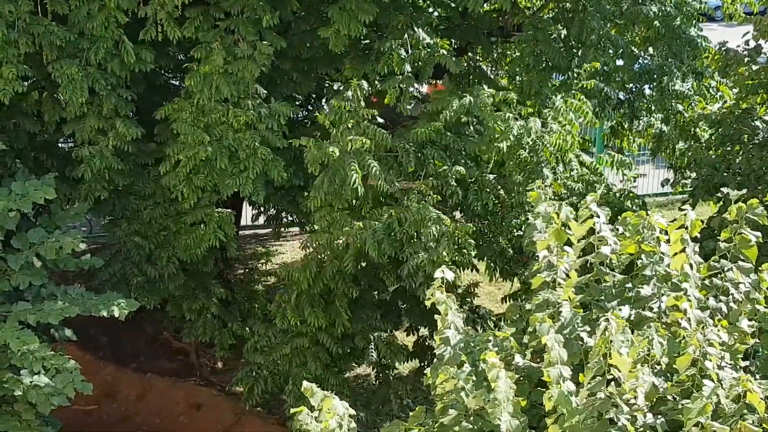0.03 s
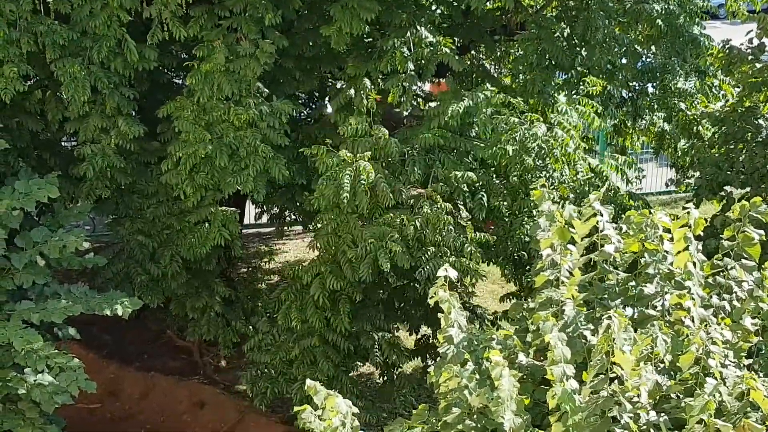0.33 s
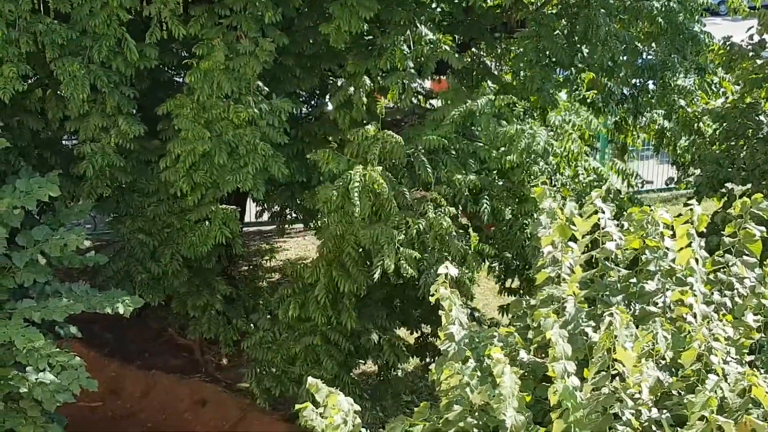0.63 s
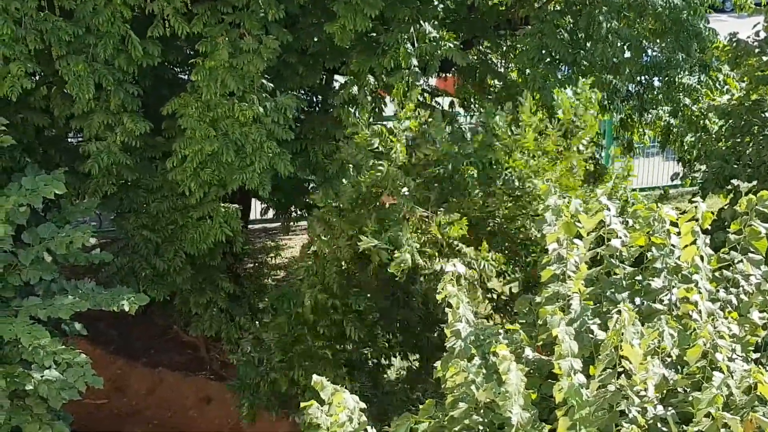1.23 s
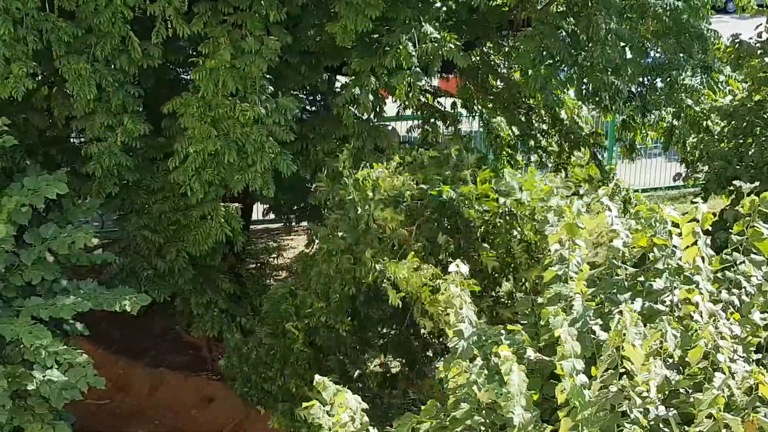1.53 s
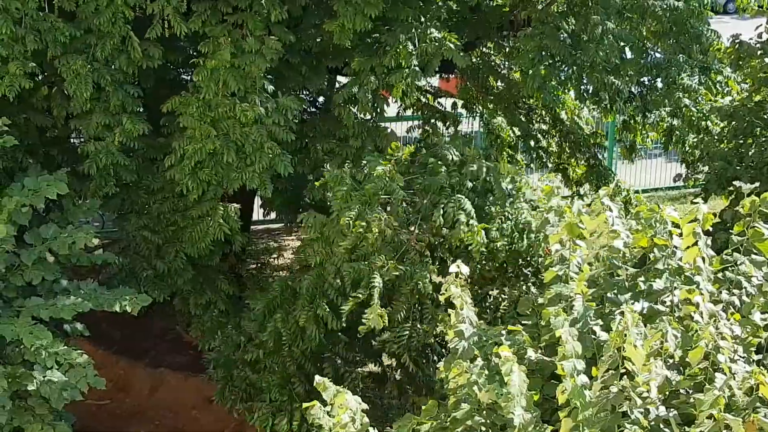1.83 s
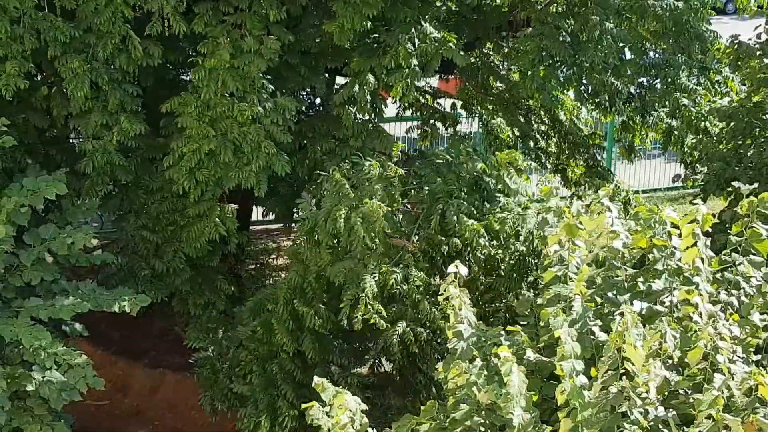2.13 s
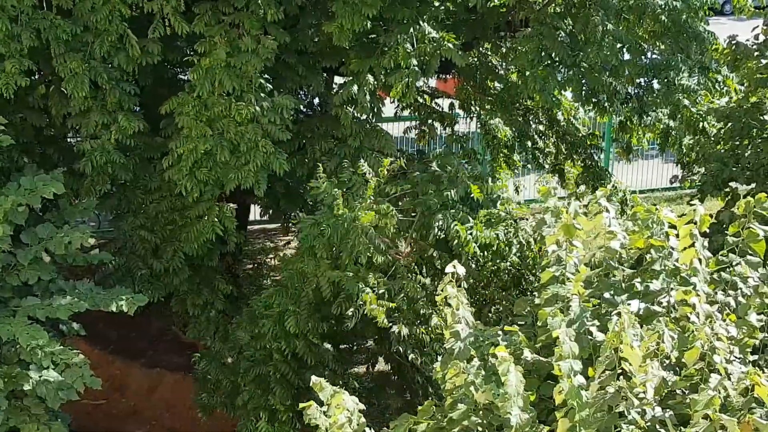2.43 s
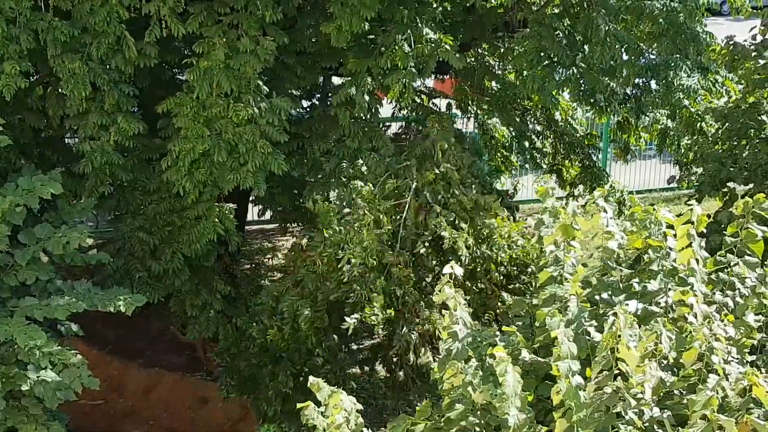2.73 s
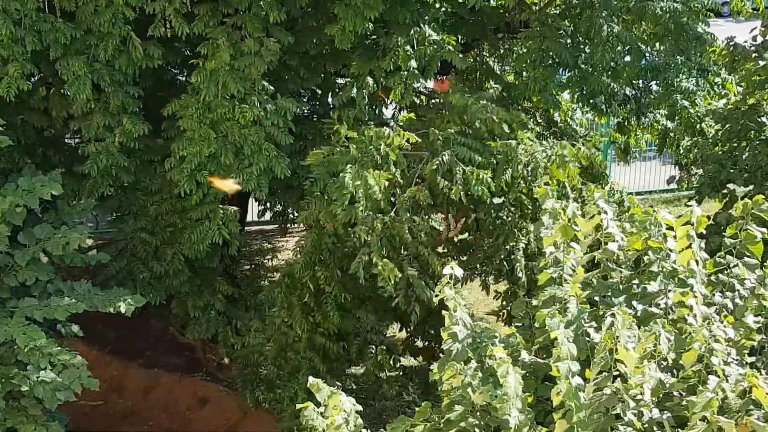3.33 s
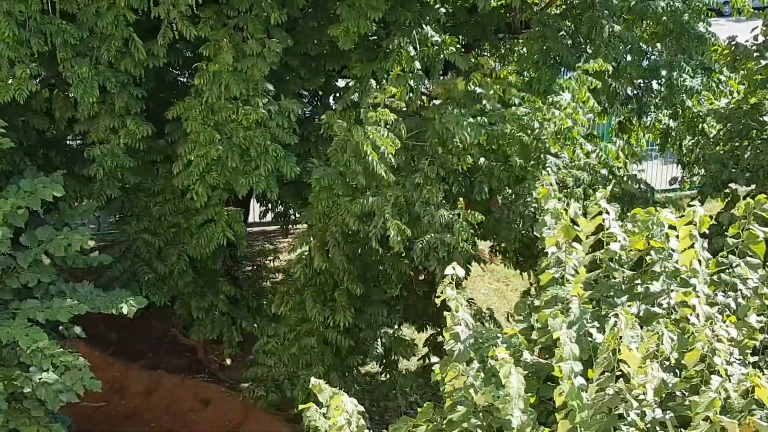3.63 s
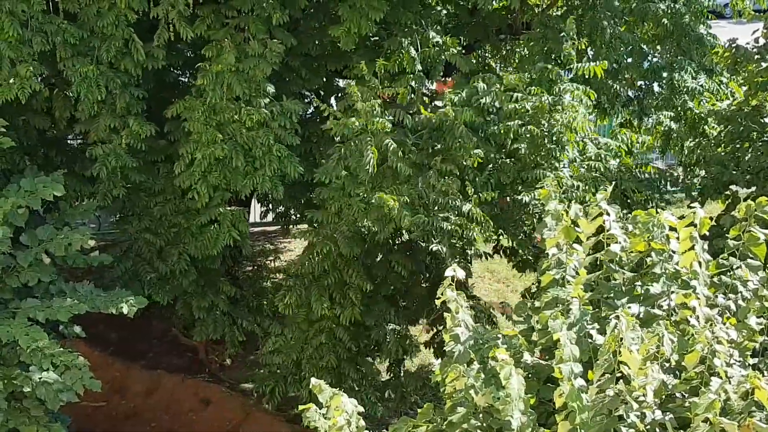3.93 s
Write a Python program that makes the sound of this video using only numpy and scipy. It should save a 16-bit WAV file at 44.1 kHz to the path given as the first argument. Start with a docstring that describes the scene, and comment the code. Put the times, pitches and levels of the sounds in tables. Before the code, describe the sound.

Wood splinters as a small tree is pushed in a park: scattered cracks, a burst of snaps with rustling foliage, a lull, then another burst. Heard from some way off, over a labouring diesel engine that slowly quietens.

```python
"""A diesel machine pushes against a small tree in a park, heard from some way off and above.
The engine labours from the start; wood begins to crack and a faint whistle passes. Just before 1 s
fibres snap in a volley, the trunk thuds and the swaying crown swishes. After 2 s the engine eases and
a puff of air rumbles by. Near 2.8 s comes a second volley and swish, then a few last cracks.
House fronts all around give the cracks a short echo."""
import sys
import numpy as np
from scipy import signal
from scipy.fft import rfft, irfft, next_fast_len
from scipy.io import wavfile

SR = 44100
rng = np.random.default_rng(int(sys.argv[2]) if len(sys.argv) > 2 else 0)


def master(y):
    """Save y as 16-bit WAV."""
    cut = np.clip(np.atleast_2d(y).T, -1, 1)
    pcm = np.round(cut * 32767)  # scale
    wavfile.write(sys.argv[1], SR, pcm.astype(np.int16))


N = 176400
FFT_SIZE = next_fast_len(N + SR, True)  # spare room for echoes
TIMES, FREQS = np.arange(N) / SR, np.arange(FFT_SIZE // 2 + 1) * SR / FFT_SIZE

# how fast the engine fires (time [s], rate [Hz])
FIRING_RATE = [(0, 56.18), (.62, 56.22), (.8, 55), (1, 53.76), (1.6, 53.89), (2.3, 53.48), (2.85, 53.66),
               (3.1, 55.03), (3.3, 56.3), (3.6, 56.2), (4, 54.97)]
# exhaust tones at 2, 3 and 4 times that rate (time [s], 2nd [dB], 3rd [dB], 4th [dB])
EXHAUST_TONES = [(0, -31, -32.5, -39.5), (.65, -32.5, -37, -43.5), (1, -30, -42.5, -57),
                 (1.3, -30.5, -41.5, -37), (1.65, -30.5, -42.5, -37.5), (2.25, -30, -39, -40),
                 (2.6, -35.5, -48, -49.5), (2.95, -44.5, -51.5, -46), (3.3, -43.5, -45, -50.5),
                 (4, -42.5, -47.5, -48.5)]
# higher engine tones (multiple of the firing rate, level [dB])
UPPER_TONES = [(5, -75), (6, -59), (7, -55), (8, -56), (10, -56.5), (11, -61.5), (12, -77), (13, -60),
               (14, -57), (16, -61)]
# how hard the engine works (time [s], rumble level [dB])
ENGINE_LOAD = [(0, -36.5), (.7, -36.5), (1.1, -36), (1.9, -38), (2.25, -40.5), (2.5, -43.5), (2.9, -45),
               (3.3, -50), (4, -54)]
# colour (mix of low and high) of the engine's rumble and clatter (frequency [Hz], gain [dB])
RUMBLE_COLOUR = [(10, -47), (25, -24), (35, -1), (50, -11.5), (80, 8), (110, 5), (150, 2.5), (230, 0.5),
                 (300, -6), (500, -57)]
CLATTER_COLOUR = [(200, -3.5), (280, -1), (340, 5), (450, 5), (520, -6.5), (590, 0.5), (740, -3.5),
                  (900, -1), (1050, -6.5), (1220, -7.5), (1500, -8), (1720, -16), (2000, -11),
                  (2300, -13.5), (2700, -37.5), (3400, -20.5), (4500, -35.5), (7000, -41), (15000, -50)]
# loudness of the clatter (time [s], level [dB])
CLATTER_LEVEL = [(0, -43.5), (.6, -45.5), (1.5, -44.5), (2.4, -45), (3.1, -46), (4, -44.5)]
# ringing panels and pump (pitch [Hz], width [Hz], level [dB])
PANEL_RINGS = [(461, 11, -51.5), (731, 50, -69), (1467, 102, -55.5), (2295, 52, -65)]

# cracks, before colouring and echo (time [s], length [s], snap level [dB], knock level [dB],
# limb pitch [Hz], splinter level [dB], splinter pitch [Hz])
CRACKS = [(.122, 0.013, -57, -70, 303, -59, 3370), (0.17, 0.016, -39, -44, 362, -50, 3200),
          (0.195, 0.032, -42.5, -40.5, 333.6, -44, 2670), (.29, .015, -52, -60, 350, -54.5, 3220),
          (0.436, 0.0048, -62, -70, 350, -55, 4300), (.46, 0.024, -42.5, -53, 321, -53, 3100),
          (0.638, 0.006, -36.5, -27.5, 170, -29.5, 1410), (0.663, 0.039, -40, -35.5, 345, -37.5, 1460),
          (.719, 0.019, -30, -52, 340, -40.5, 2800), (0.764, 0.059, -36.5, -37, 255, -52, 2300),
          (0.807, 0.021, -31.5, -26, 212, -41.5, 3180), (0.836, 0.018, -26, -30.5, 221, -32.5, 2850),
          (0.874, 0.032, -31.5, -29, 346, -43, 2100), (0.896, 0.0085, -36, -32.5, 237.3, -53, 2500),
          (.94, 0.057, -42, -34, 314.3, -42, 2140), (2.68, 0.013, -47, -60, 401, -45.5, 2767),
          (2.742, 0.03, -32, -39.5, 161.5, -63, 1500), (2.75, 0.0074, -29, -34, 585, -40, 1360),
          (2.77, 0.022, -26, -35, 864, -32, 2870), (2.817, 0.028, -35.5, -40, 439, -41, 2470),
          (2.857, 0.012, -33.5, -37.5, 361, -55, 2940), (2.914, 0.013, -36, -50, 440, -42, 4200),
          (2.952, .035, -31.5, -38.5, 382, -41.5, 2970), (3.005, 0.018, -44, -37.5, 341, -47, 2600),
          (3.207, 0.021, -36.5, -40.5, 319, -65, 1500), (3.266, 0.02, -37, -48, 432, -48, 2980),
          (3.316, .015, -56, -49, 555, -54, 2700), (3.706, 0.038, -44, -60, 463, -53, 2403)]
# colour of snaps and of splinters (frequency [Hz], gain [dB])
SNAP_COLOUR = [(100, -16.5), (220, 3.5), (420, 6.5), (580, 3.5), (700, -0.5), (900, 6.5), (1120, -5),
               (1420, 5.5), (1700, -7.5), (2000, -3.5), (3000, -14), (5000, -27), (9000, -39.5),
               (15000, -75.5)]
SPLINTER_COLOUR = [(500, -21), (1400, -6.5), (3000, -1.5), (5500, -8), (7300, -7), (8600, -4), (10500, -19),
                   (15000, -4)]
# the tones a limb rings with (multiple of its pitch, time to fade by 60 dB [s], gain [dB])
LIMB_TONES = [(1.001, 0.24, 2.5), (2.03, 0.14, -8), (2.9, 0.11, -20)]

# swaying crown (time [s], leaf level [dB], twig level [dB])
CROWN_LEVELS = [(0, -90, -59.5), (.2, -68, -46), (.4, -80, -57.5), (.78, -75, -47.5), (.83, -54.5, -34.5),
                (.95, -59, -40.5), (1.07, -56.5, -45.5), (1.35, -59.5, -53), (1.5, -56, -49.5),
                (1.8, -64, -53), (2.1, -67.5, -54.5), (2.5, -65.5, -54.5), (2.66, -58.5, -50.5),
                (2.78, -48.5, -31), (2.88, -44, -36), (3.02, -46, -42.5), (3.15, -52, -44.5),
                (3.25, -56, -47.5), (3.5, -64, -53), (4, -67, -55)]
# nearer twigs ticking (time [s], strength [dB])
TWIG_TICKS = [(1.475, -56), (1.49, -80), (2.858, -52), (2.875, -46.5), (2.917, -51), (3.118, -64),
              (3.21, -60)]
# colour of leaves, twigs and ticks (frequency [Hz], gain [dB])
LEAF_COLOUR = [(2500, 6), (4500, -0.5), (6200, 5.5), (7400, 0), (8500, 6), (10200, -2.5), (11700, 3.5),
               (13500, -3), (15500, 0)]
TWIG_COLOUR = [(250, -5), (500, 12), (1400, 4), (2800, 0), (4000, -4), (5500, -12), (8000, -41),
               (15000, -34)]
TICK_COLOUR = [(2500, -20), (6000, -20), (8500, 12), (10200, -3), (12000, 15), (15500, -2)]

# puff of air (time [s], level [dB])
BREEZE_LEVEL = [(0, -72), (1.3, -62), (1.75, -50), (2.05, -47), (2.25, -34.5), (2.45, -49), (2.8, -51),
                (3.1, -63), (4, -80)]
# colour of that puff (frequency [Hz], gain [dB])
BREEZE_COLOUR = [(10, -26), (25, -4), (50, -15), (75, 7.5), (120, 5), (200, -4), (400, -33), (1000, -71)]
# thin high whistle (time [s], pitch [Hz], level [dB])
WHISTLE_ARCH = [(.42, 9250, -87), (.45, 9500, -79), (.49, 10050, -78), (.52, 10120, -75), (.55, 9700, -79),
                (.59, 9100, -85)]
# colour of the distant hiss (frequency [Hz], gain [dB])
HISS_COLOUR = [(200, -7), (2000, 5.5), (5000, -14), (8500, -20), (10500, -20.5), (15500, -28)]

# stereo width: "mid" is what both ears share, "side" is the rest (frequency [Hz], side gain [dB])
STEREO_WIDTH = [(30, -14), (60, -26), (110, -33.5), (200, -27.5), (300, -10.5), (400, -14), (700, -3),
                (1300, -2), (2400, -1.5), (4400, -0.5), (9000, 0)]
# lean to one ear (frequency [Hz], left over right [dB])
STEREO_BALANCE = [(60, -0.28), (110, -0.71), (380, 0.84), (700, 1.5), (1290, -1.5), (2380, 1.4),
                  (8000, 0.85), (15000, -.3)]


def engine(waver_db=1.8, upper_waver_db=3, jitter=0.003985, pulse_depth=0.2, flutter_db=-0.47):
    """Firings make wavering tones, rumble grows with load, and metal clatters in time with the firings."""
    phase = 2 * np.pi * np.cumsum(curve(FIRING_RATE) * (1 + jitter * wander(11))) / SR

    def tone(multiple, db):
        """One engine tone, shifted so that the tones do not all peak together."""
        return np.sqrt(2) * gain(db) * wide_sine(multiple * phase - np.pi * multiple ** 2 / 3)

    load_db = curve(ENGINE_LOAD)
    firing_db = -44.5 + 0.69 * (load_db + 38)  # the lowest tone follows the load
    tones = tone(1, firing_db + waver_db * wander(5.7))
    for multiple in (2, 3, 4):
        tones += tone(multiple, curve(EXHAUST_TONES, column=multiple - 1) + waver_db * wander(14))
    for multiple, db in UPPER_TONES:
        tones += tone(round(multiple), db + upper_waver_db * wander(3.3))
    rumble = unit(colour(noise(), RUMBLE_COLOUR)) * gain(load_db)
    pulse = np.exp(pulse_depth * np.cos(phase) + 0.1 * np.cos(2 * phase))
    pulse = unit(pulse * gain(flutter_db * wander(8.5)))
    clatter = unit(colour(noise(), CLATTER_COLOUR)) * gain(curve(CLATTER_LEVEL))
    for hz, width, db in PANEL_RINGS:
        peak = 1 / (1 + (2 * (FREQS - hz) / width) ** 2)
        clatter += gain(db) * unit(filtered(noise(), peak))
    return tones + rumble + clatter * pulse


def splitting_wood(fibres_per_s=1400, scatter_db=4, ring_q=4.5, hiss=.01, trunk_low_hz=131):
    """Each crack is one snap and a volley of tearing fibres; a splinter rings and the limb knocks."""
    snaps, splinters, knocks = np.zeros((3, N + SR))
    t = TIMES[:SR // 2]
    hz = np.arange(len(t) // 2 + 1) * SR / len(t)
    for start, length, snap_db, knock_db, limb_hz, splinter_db, splinter_hz in CRACKS:
        breaks = rng.random(len(t)) < fibres_per_s / SR
        signs, sizes, shake = rng.standard_normal((3, len(t)))
        fibres = breaks * np.sign(signs) * gain(scatter_db * np.clip(sizes, -2, 2))
        fibres *= np.exp(-(t / length) ** 4)
        fibres[0] = 1.6  # the first snap
        ringing = 1 / (1 - (hz / splinter_hz) ** 2 + 1j * hz / splinter_hz / ring_q)
        splinter = irfft(rfft(fibres) * (ringing + 1j * hiss))
        add_burst(snaps, start, fibres, snap_db)
        add_burst(splinters, start, splinter, splinter_db)
        add_burst(knocks, start, limb_knock(t, hz, limb_hz, shake), knock_db)
    bass_cut = 1 / (1 + (trunk_low_hz / (FREQS + 1)) ** 8)  # a thin trunk gives off no deep bass
    body = filtered(colour(snaps[:N], SNAP_COLOUR), bass_cut)
    bite = filtered(splinters[:N], response(SPLINTER_COLOUR))
    cracks = park_echo(body + bite)
    knock_side = park_echo(knocks[:N])[1]  # knocks echo in the side only
    return cracks + np.array([knocks[:N], knock_side])


def limb_knock(t, hz, limb_hz, shake, rise_s=0.005, roughness=0.79, flutter_hz=59):
    """A limb rings with a few dull, fading tones, roughened by the random shake."""
    ring = sum(gain(db - 60 * t / fade_s) * np.sin(2 * np.pi * multiple * limb_hz * t)
               for multiple, fade_s, db in LIMB_TONES)
    flutter = unit(irfft(rfft(shake) / (1 + (hz / flutter_hz) ** 4)))
    return ring * (1 - np.exp(-t / rise_s)) * (1 + roughness * flutter)


def swaying_crown(flutter_db=1.2):
    """Leaves brush and twigs scrape as the treetop swings; a few nearer twigs tick."""
    leaves = colour(rustle(per_s=8600, scatter_db=2.5, fade_s=0.0012), LEAF_COLOUR)
    leaves *= gain(curve(CROWN_LEVELS) + flutter_db * wander(13))
    twigs = colour(rustle(per_s=1800, scatter_db=1.0, fade_s=0.0023), TWIG_COLOUR)
    twigs *= gain(curve(CROWN_LEVELS, column=2) + flutter_db * wander(17))
    clicks = np.zeros(N)
    for start, db in TWIG_TICKS:
        clicks[int(start * SR)] = gain(db) * np.sqrt(.05 * SR)
    scatter = .35 * fading_noise(0.0018) + 0.36 * fading_noise(0.062)
    ticks = colour(filtered(clicks, rfft(scatter, FFT_SIZE)), TICK_COLOUR)
    return leaves + twigs + ticks


def rustle(per_s, scatter_db, fade_s):
    """Countless small touches of uneven size, each a short dying puff of noise."""
    touches = rng.random(N) < per_s / SR
    sizes = gain(scatter_db * np.minimum(rng.exponential(size=N), 5))
    energy = signal.lfilter([1], [1, -np.exp(-1 / (fade_s * SR))], touches * sizes ** 2)
    return unit(np.sqrt(energy) * noise())


def breeze(gust_db=2):
    """A puff of air buffets the left and right microphones separately."""
    return unit(colour(noise(), BREEZE_COLOUR)) * gain(curve(BREEZE_LEVEL) + gust_db * wander(11))


def whistle(waver=.008):
    """A faint, thin tone rises and falls among the trees."""
    hz = curve(WHISTLE_ARCH) * (1 + waver * wander(200))
    sounding = (TIMES > WHISTLE_ARCH[0][0]) & (TIMES < WHISTLE_ARCH[-1][0])
    return wide_sine(2 * np.pi * np.cumsum(hz) / SR) * gain(curve(WHISTLE_ARCH, column=2)) * sounding


def distant_hiss(level_db=-60.5):
    """A soft, steady hiss from far away."""
    return gain(level_db) * colour(noise(), HISS_COLOUR)


def park_echo(sound, near_s=0.19, near_db=2.5, houses_s=0.47, houses_db=1, dull_hz=14000):
    """Direct sound, quick scatter from ground and trees, and a duller tail from the house fronts."""
    swell = 1 - np.exp(-TIMES / .04)
    houses = rfft(fading_noise(houses_s) * swell, FFT_SIZE) / (1 + (FREQS / dull_hz) ** 2)
    near = rfft(fading_noise(near_s), FFT_SIZE)
    direct_mid, direct_side = .7, .15
    paths = np.array([[direct_mid], [direct_side]]) + gain(near_db) * near + gain(houses_db) * houses
    total = np.sqrt(direct_mid ** 2 + gain(near_db) ** 2 + gain(houses_db) ** 2)
    return filtered(sound, paths / total)


def gain(db):
    """Turn decibels into a number to multiply by."""
    return 10 ** (np.asarray(db) / 20)


def unit(x):
    """Scale to an average strength (rms) of 1."""
    return x / np.sqrt(np.mean(x ** 2))


def curve(rows, column=1):
    """Join one column of a time table with straight lines."""
    rows = np.array(rows, float)
    return np.interp(TIMES, rows[:, 0], rows[:, column])


def response(points):
    """Gain at every frequency from (frequency [Hz], gain [dB]) points."""
    hz, db = np.array(points, float).T
    return gain(np.interp(np.log(FREQS + 1), np.log(hz), db))


def filtered(sound, gains):
    """Turn each frequency up or down by its gain."""
    return irfft(rfft(sound, FFT_SIZE) * gains, FFT_SIZE)[..., :N]


def colour(sound, points):
    """Shape lows and highs with a filter that keeps the power of white noise."""
    cepstrum = irfft(np.log(unit(response(points))), FFT_SIZE)
    # folding this makes the filter ring after a click, never before it
    cepstrum[1:FFT_SIZE // 2] *= 2
    cepstrum[FFT_SIZE // 2 + 1:] = 0
    return filtered(sound, np.exp(rfft(cepstrum)))


def noise():
    """Two unrelated white noises."""
    return rng.standard_normal((2, N))


def wander(rate_hz):
    """A smooth random wobble of typical size 1."""
    return unit(filtered(rng.standard_normal(N), 1 / (1 + (FREQS / rate_hz) ** 4)))


def fading_noise(fade_s):
    """Mid and side noise of energy 1 that falls 60 dB in fade_s."""
    tail = noise() * gain(-60 * TIMES / fade_s)
    return tail / np.sqrt(np.sum(tail ** 2, axis=1, keepdims=True))


def wide_sine(phase):
    """A pure tone as mid and side, a quarter cycle apart."""
    return np.sin(phase + np.array([[0], [np.pi / 2]]))


def add_burst(track, start, sound, db, span_s=.05):
    """Mix in a sound with the energy of a steady level db held for span_s."""
    i = int(start * SR)
    track[i:i + len(sound)] += gain(db) * sound * np.sqrt(span_s * SR / np.sum(sound ** 2))


def scene():
    """Mix everything to left and right: the bass is centred, the treble wide, the breeze added last."""
    mid, side = engine() + splitting_wood() + swaying_crown() + whistle() + distant_hiss()
    side = filtered(side, response(STEREO_WIDTH))
    lean = np.sqrt(response(STEREO_BALANCE))
    left, right = filtered(mid + side, lean), filtered(mid - side, 1 / lean)
    return np.array([left, right]) + breeze()


def record(dry, top_hz=15750):
    """Cut away the very highest treble."""
    return signal.sosfilt(signal.ellip(10, .2, 80, top_hz, fs=SR, output="sos"), dry)


dry = scene()
out = record(dry)
master(out)
```